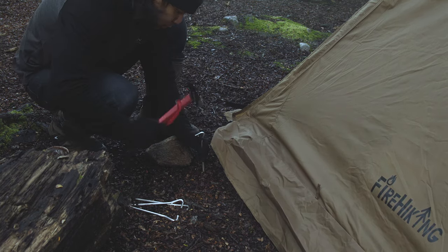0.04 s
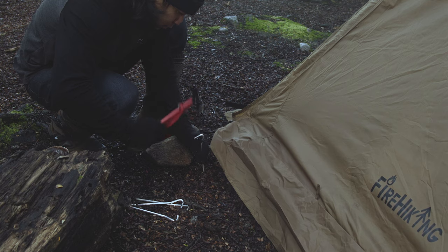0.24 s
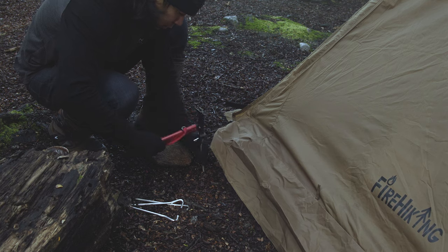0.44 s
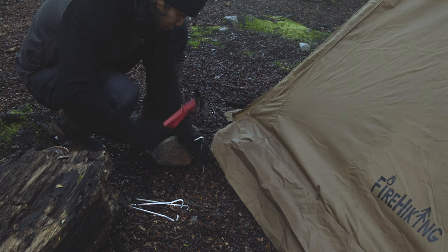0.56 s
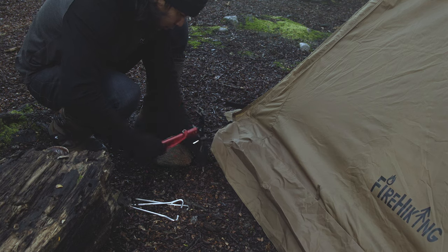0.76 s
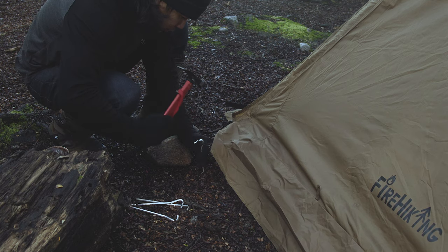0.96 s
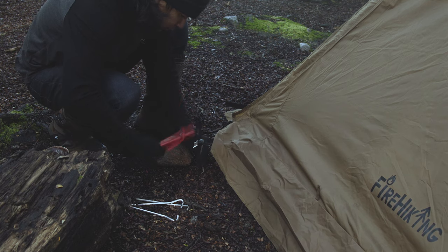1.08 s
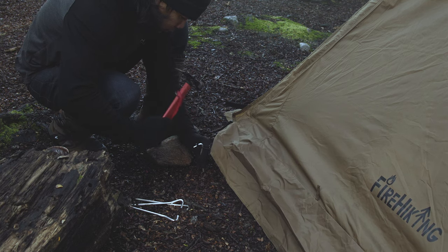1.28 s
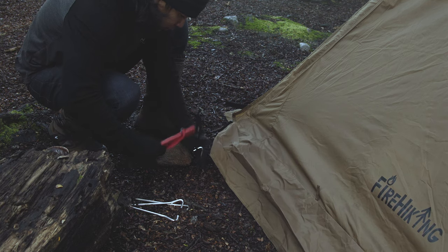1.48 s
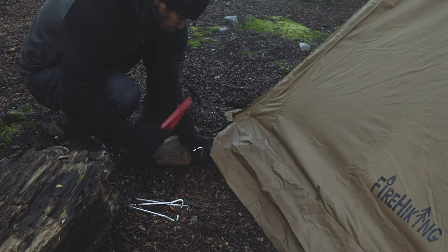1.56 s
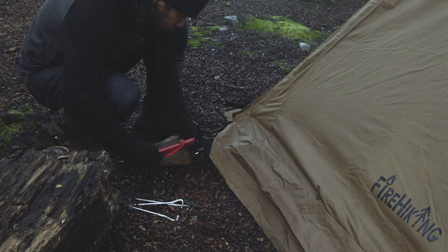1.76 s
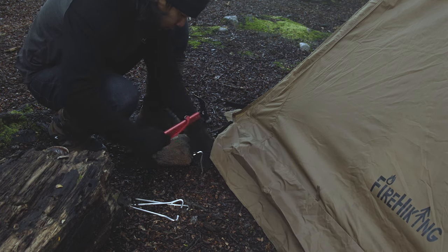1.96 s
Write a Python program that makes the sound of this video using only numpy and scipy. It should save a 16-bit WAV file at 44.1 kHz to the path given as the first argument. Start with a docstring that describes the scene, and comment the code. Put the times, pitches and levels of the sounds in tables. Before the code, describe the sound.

Six steady hammer blows clink on a thin steel stake in a quiet forest, fading out.

```python
"""A forest: a hammer drives a metal tent stake into the soil in six even blows, close by in stereo.
Each blow chatters on the steel, so decaying modes ring and a noise burst cracks; the free shaft sings on.
A push and a falling sine thump the ground, with a knock from the handle and faint ticks of grit.
The trees return a thin echo of the metal (decaying noise taps) over a quiet hush of shaped noise.
The whole scene sinks in level towards the end."""
import sys
import numpy as np
from scipy import signal
from scipy.fft import rfft, irfft
from scipy.io import wavfile
from scipy.ndimage import uniform_filter1d

SR = 44100
rng = np.random.default_rng(int(sys.argv[2]) if len(sys.argv) > 2 else 0)


def pcm_store(signal):
    """Save signal as 16-bit PCM."""
    levels = np.round(np.clip(np.atleast_2d(signal), -1, 1) * 32767)
    wavfile.write(sys.argv[1], SR, levels.astype(np.int16).T)


def invert_db(x):
    """Field ratio 10**(x/20) for x, a level in decibels (scalar or array-like)."""
    u = np.asarray(x, float) / 20
    return 10 ** u


N = 89214  # length in samples


def evened(x):
    """Scales to rms 1."""
    return x / np.sqrt(np.mean(x ** 2) + 1e-20)


def smoothed_twice(x, size, axis):
    """Two running means, for a softly wandering curve."""
    return uniform_filter1d(uniform_filter1d(x, size, axis=axis), size, axis=axis)


def read(points, hz):
    """Reads a table on a log-frequency axis."""
    f, value = np.transpose(points)
    return np.interp(np.log(hz + 1), np.log(f + 1), value)


def add(mix, s, sound):
    """Mixes a sound in at time s."""
    part = mix[..., round(s * SR):][..., :sound.shape[-1]]
    part += sound[..., :part.shape[-1]]


def dying(t, t60):
    """Exponential decay, 60 dB down after t60 seconds."""
    return invert_db(-60 * t / t60)


# Spectrum of the forest air, relative: f/Hz, level/dB per Hz
HUSH_COLOUR = [(15, -55), (25, -18.5), (48, 4), (118, -7), (241, -7.5), (415, -7.5), (476, -14.5),
               (517, -10.5), (757, -14), (845, -13.5), (3050, -29), (13300, -28.5), (17000, -46)]
# Likeness of left and right in the air: f/Hz, correlation (-1 to 1)
HUSH_LIKENESS = [(60, 0.98), (130, 0.91), (290, 0.84), (640, 0.37), (1410, -0.06), (3100, -0.11),
                 (6820, -0.0), (15000, 0.03)]
HUSH_DB = -63
PATCHY_DB, SWELL_DB = 1.2, 0.6  # rms unevenness in time and pitch; rms swell of the whole


def hush():
    """Forest air: random short-time spectra with patches and a slow swell."""
    frames, hz = N // 512 + 5, np.fft.rfftfreq(2048, 1 / SR)
    a, b, c, d, patches = rng.standard_normal((frames, len(hz), 5)).T
    # the first axis is frequency, the second is time
    patches = uniform_filter1d(patches, size=16, axis=0)
    patches = evened(uniform_filter1d(patches, size=6, axis=1))
    swell = evened(uniform_filter1d(rng.standard_normal(frames), size=20))
    same = np.clip(read(HUSH_LIKENESS, hz), -1, 1)[:, None]
    left = a + 1j * b
    right = same * left + np.sqrt(1 - same ** 2) * (c + 1j * d)
    level_db = read(HUSH_COLOUR, hz)[:, None] + PATCHY_DB * patches + SWELL_DB * swell
    spectra = np.array([left, right]) * invert_db(level_db)
    air = signal.istft(spectra, nperseg=2048, noverlap=1536)[1][:, :N]
    return invert_db(HUSH_DB) * evened(air)


# How long the woodland echo lasts: f/Hz, t60/s
ECHO_T60 = [(1000, 0.33), (2500, 0.79), (5000, 1), (9000, 0.51), (16000, 0.69)]
# Tone of the woodland echo, relative: f/Hz, level/dB
ECHO_TONE = [(500, -11.5), (2000, -6.5), (4000, -11), (8000, -4), (12000, -5), (16000, -1)]
ECHO_DB, ECHO_START_S = -25, 0.019


def trees(x):
    """Diffuse echo from trunks and leaves, each band dying at its own speed."""
    taps = rng.standard_normal((2, SR)) * (np.arange(SR) > ECHO_START_S * SR)
    hz, t, z = signal.stft(taps, SR, nperseg=256)
    z = z * invert_db(read(ECHO_TONE, hz))[:, None] * dying(t, read(ECHO_T60, hz)[:, None])
    tail = signal.istft(z, SR, nperseg=256)[1]
    tail = tail / np.linalg.norm(tail[0])
    return invert_db(ECHO_DB) * signal.fftconvolve(x, tail, axes=1)[:, :N]


TICK_T60, TICK_WIDE = 0.017, 1.5  # s; band edges as a ratio to the centre


def tick(db, hz):
    """A faint grain of grit: a dying burst of band-passed noise, independent left and right."""
    t = np.arange(2048) / SR
    band = signal.butter(2, [hz / TICK_WIDE, hz * TICK_WIDE], "bandpass", fs=SR)
    grain = evened(signal.lfilter(*band, rng.standard_normal((2, len(t)))))
    return invert_db(db) * dying(t, TICK_T60) * grain


# Faint ticks of grit: t/s, level/dB, centre f/Hz
GRIT_TICKS = [(1.611, -56.5, 3555), (1.756, -51.5, 8190), (1.7648, -51, 7400)]


def grit():
    """Places the separate grains of grit in time."""
    grains = np.zeros((2, N))
    for s, db, hz in GRIT_TICKS:
        add(grains, s, tick(db, hz))
    return grains


# Further modes of the ground: f/Hz, level/dB relative to the thump, t60/s
SOIL_MODES = [(66, -5.5, 0.15), (249.5, -11, 0.07), (305, -11.5, 0.066), (395.5, -17.5, 0.081)]
THUMP_HZ, THUMP_END_HZ, THUMP_LAG_S = 137, 118, 0.0019  # soil swing
THUMP_HOLD_S, THUMP_DROP_DB, THUMP_T60 = 0.018, -7.5, 0.097
HOLD_T60 = 0.61  # s, slow loss from the start of the swing
PUSH_DB, PUSH_S, PUSH_LAG_S = -1, 0.0006, 0.001  # level relative to the thump


def thump():
    """The soil is pushed, then swings, holds, and drops in level and pitch beside weaker modes."""
    t = np.arange(SR // 4) / SR
    u = np.maximum(t - THUMP_LAG_S, 0)
    past_hold = 1 / (1 + np.exp(-(u - THUMP_HOLD_S) / 0.002))  # soft step from 0 to 1
    hz = THUMP_HZ + (THUMP_END_HZ - THUMP_HZ) * past_hold
    level = invert_db(THUMP_DROP_DB * past_hold) * dying(u, HOLD_T60)
    level = level * dying(np.maximum(u - THUMP_HOLD_S, 0), THUMP_T60)
    swing = level * np.sin(2 * np.pi * np.cumsum(hz * (u > 0)) / SR)
    push = -invert_db(PUSH_DB) * np.exp(-((t - PUSH_LAG_S) / PUSH_S) ** 2)
    modes = -sum(invert_db(db) * dying(u, t60) * np.sin(2 * np.pi * f * u) for f, db, t60 in SOIL_MODES)
    return swing + push + modes


KNOCK_HZ, KNOCK_T60, KNOCK_RISE_S = 748, 0.11, 0.0016


def knock():
    """One mode of the handle, struck and dying away."""
    t = np.arange(SR // 4) / SR
    return (1 - np.exp(-t / KNOCK_RISE_S)) * dying(t, KNOCK_T60) * np.sin(2 * np.pi * KNOCK_HZ * t)


WAVER, WAVER_HZ = 0.9, 90  # share of each mode that rattles; its speed (smoothing span is 1 / WAVER_HZ)


def rattle(count, size):
    """A slowly wandering complex gain for each mode: soil and hand rub the ringing steel."""
    loose = rng.standard_normal((2, count, size))
    loose = evened(smoothed_twice(loose, SR // WAVER_HZ, axis=2))
    return np.sqrt(1 - WAVER ** 2) + WAVER * (loose[0] + 1j * loose[1]) / np.sqrt(2)


# Modes of the shaft standing free of the soil: f/Hz, level/dB, t60/s,
# lingering part level/dB relative to the mode, its t60/s
SHAFT_MODES = [(3268, -4, 0.055, -29, .5), (4568, -15, 0.023, -22, 0.17)]


def shaft(db):
    """The free part of the stake sings on with a waver."""
    t = np.arange(SR // 2) / SR
    hz, mode_db, t60, linger_db, linger_t60 = np.transpose(SHAFT_MODES)[:, :, None]
    linger = invert_db(linger_db) * dying(t, linger_t60) * rattle(count=len(hz), size=len(t))
    shape = dying(t, t60) + linger
    modes = invert_db(mode_db) * shape * np.exp(2j * np.pi * hz * t)
    return invert_db(db) * modes.imag.sum(axis=0)


# Phase between the stereo ports: f/Hz, left lead/rad
PORT_LEAD = [(0, 0), (2150, -0.2), (3270, 0.6), (5680, 0.3), (6370, 2.2), (7410, -1.1), (7840, -1.1),
             (8530, -3.8), (8960, -3.5), (10100, -5.7), (12700, -5.2), (14900, 2.3), (15400, 8.6),
             (16700, 9.5)]


def left_lead(hz):
    """Radians by which the left port leads the right."""
    return np.interp(hz, *np.transpose(PORT_LEAD))


# Spectrum of the crack, relative: f/Hz, level/dB per Hz
CRACK_COLOUR = [(180, -48.5), (300, -10.5), (600, -17.5), (1860, -19), (2520, 1.5), (3360, -1.5),
                (6490, -7.5), (6940, -1.5), (7810, 10), (11700, -9), (15100, -1), (17000, -27.5)]
CRACK_DB, CRACK_RISE_S, CRACK_T60 = 13, 0.00017, 0.014
SETTLE_DB, SETTLE_T60 = -22, 0.066  # longer crunch, relative to the burst
GRIT_DB = 5  # rms unevenness of the crunch


def crack(colour):
    """A fast noise burst at contact, followed by a weaker, uneven crunch."""
    t = np.arange(SR // 3) / SR
    hz = np.fft.rfftfreq(len(t), 1 / SR)
    side = np.array([[0.5], [-0.5]])  # left, right
    noise = rfft(rng.standard_normal(len(t))) * invert_db(read(CRACK_COLOUR, hz))
    noise = rfft(evened(irfft(noise)))
    noise = irfft(noise * invert_db(read(colour, hz)) * np.exp(1j * side * left_lead(hz)))
    unevenness = evened(uniform_filter1d(rng.standard_normal(len(t)), size=40))
    crunch = invert_db(SETTLE_DB + GRIT_DB * unevenness) * dying(t, SETTLE_T60)
    burst = (1 - np.exp(-t / CRACK_RISE_S)) * (dying(t, CRACK_T60) + crunch)
    return invert_db(CRACK_DB) * noise * burst


# Pitches of the steel modes: f/Hz
MODE_HZ = [1560, 2482, 2725, 3150, 3313, 4040, 4450, 5450, 6285, 7015, 7700, 7815, 8292, 8695, 8860, 9506,
           10650, 12900, 14830, 15715]
# The same modes in order: level/dB struck centrally, level/dB struck off-centre, t60/s,
# lingering part level/dB relative to the mode, left minus right level/dB
STEEL_MODES = [(-31, -7.5, 0.014, -34, 3), (-27, -8.5, 0.043, -30, 4), (-29.5, -10, 0.082, -25, 6.5),
               (1, -18.5, 0.012, -39.5, 1.5), (-6.5, 0.5, 0.033, -33, 4), (-18, -11, 0.0085, -43, 11),
               (2.5, -14.5, 0.0096, -39.5, 5), (-9, -9, 0.02, -30.5, 10), (-13, -9.5, 0.042, -36.5, 4),
               (-20, 4, 0.028, -52.5, 2.5), (1, -10, 0.033, -31.5, -7), (2, -7, 0.012, -35, -7),
               (-9.5, -3, 0.011, -33, 5.5), (-8.5, -1, 0.035, -37.5, 12.5), (6.5, -8, 0.039, -30.5, -1.5),
               (-4.5, 3, 0.044, -43, 1.5), (-2, -22.5, 0.037, -64.5, 2), (-10, -13, 0.011, -33, 0),
               (4.5, -0.5, 0.011, -28.5, 4.5), (-15, -21, 0.048, -30, 4.5)]
RING_DB, LINGER_T60 = 3, 0.16  # overall ring trim; decay of the lingering part in s
SCATTER_DB = 3  # random spread of each mode from blow to blow
CHATTER_S, RING_RISE_S = 0.00052, 0.00029  # modes start up to CHATTER_S late


def ring(colour, off):
    """A chattering contact starts the steel modes at scattered instants; each rattles and dies."""
    t = np.arange(SR // 3) / SR
    f = np.array(MODE_HZ)[:, None]
    side = np.array([0.5, -0.5])[:, None, None]  # left, right
    centre_db, edge_db, t60, linger_db, pan_db = np.transpose(STEEL_MODES)[:, :, None]
    off = np.clip(off, 0, 1)
    db = RING_DB + read(colour, f) + (1 - off) * centre_db + off * edge_db
    db = db + SCATTER_DB * rng.standard_normal(f.shape)
    since_contact = np.maximum(t - CHATTER_S * rng.random(f.shape), 0)
    rise = 1 - np.exp(-since_contact / RING_RISE_S)
    decay = dying(t, t60) + invert_db(linger_db) * dying(t, LINGER_T60)
    shape = invert_db(db) * rise * decay * rattle(count=len(f), size=len(t))
    phase = 2 * np.pi * (f * t + rng.random(f.shape)) + side * left_lead(f)
    return (shape * invert_db(side * pan_db) * np.exp(1j * phase)).imag.sum(axis=1)


HOLLOW_DB = -6  # central blows are weaker around 2.6 kHz


def steel(low_db, body_db, mid_db, high_db, off):
    """Hammer on steel: ringing modes and a crack share the tone of the blow."""
    hollow_db = low_db + HOLLOW_DB * (1 - off)
    colour = [(1700, low_db), (2600, hollow_db), (3050, low_db), (3500, low_db),
              (3900, body_db), (5800, body_db), (6600, mid_db), (10800, mid_db), (12000, high_db)]
    return ring(colour, off) + crack(colour)


# Hammer blows: t/s, then ring level/dB in four bands (f/Hz below 3600, 3600-6000, 6000-11000, above),
# thump level/dB, knock level/dB, off-centre (0-1), free-shaft ring level/dB
HAMMER_BLOWS = [(0.155, -23.5, -28, -29, -25, -45, -42.5, 0.4, -25),
                (0.4854, -20.5, -23, -23.5, -25, -38, -43, 0.43, -47),
                (0.8066, -18, -23, -23.5, -29.5, -34, -44, 0, -43),
                (1.1364, -19, -18.5, -24.5, -21.5, -31.5, -38, 0.2, -49),
                (1.4664, -22, -19.5, -23.5, -27, -33.5, -42.5, 1, -40),
                (1.777, -24, -17.5, -22.5, -22.5, -32, -43, 1, -41)]


def scene():
    """Hush, the blows on metal and soil, grit, and the trees' echo of the metal."""
    metal, soil = np.zeros((2, N)), np.zeros((2, N))
    for s, *ring_db, thump_db, knock_db, off, shaft_db in HAMMER_BLOWS:
        add(metal, s, steel(*ring_db, off))
        add(metal, s, shaft(shaft_db)[None])
        ground = invert_db(thump_db) * thump() + invert_db(knock_db) * knock()
        add(soil, s, ground[None])
    return hush() + trees(metal) + grit() + soil + metal


def low_pass(x):
    """Removes everything above the highest recorded frequency."""
    return signal.sosfilt(signal.butter(12, 17140, fs=SR, output="sos"), x)


# Closing fade of the whole scene: t/s, level/dB
FADE_OUT = [(1.498, -2), (1.75, -5.5), (1.902, -9), (2.02, -13)]
BASS_CUT_HZ, EDGE_HZ = 52, 17100  # microphone roll-off; upper band limit


def record(dry):
    """The microphone rolls off the bass; the level fades and the top of the band is cut."""
    rolled_off = signal.lfilter(*signal.butter(2, BASS_CUT_HZ, "highpass", fs=SR), dry)
    faded = rolled_off * invert_db(np.interp(np.arange(N) / SR, *np.transpose(FADE_OUT)))
    edge = signal.firwin(255, EDGE_HZ, window=("kaiser", 9), fs=SR)[None]
    mix = signal.oaconvolve(faded, edge, "same")
    return low_pass(mix)


dry = scene()
out = record(dry)
pcm_store(out)
```